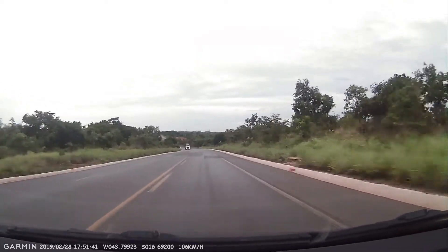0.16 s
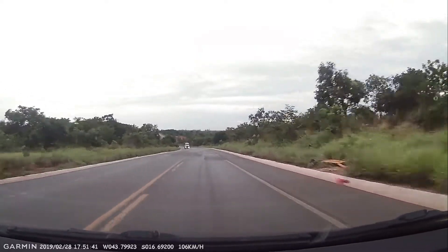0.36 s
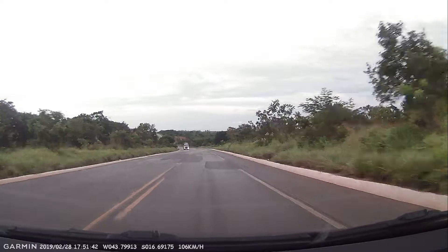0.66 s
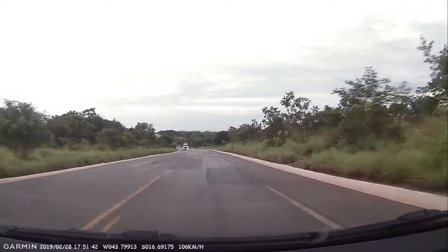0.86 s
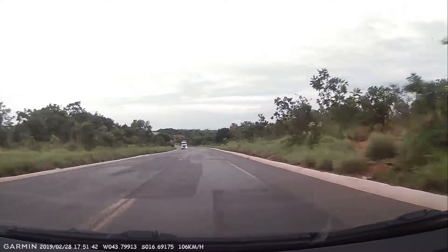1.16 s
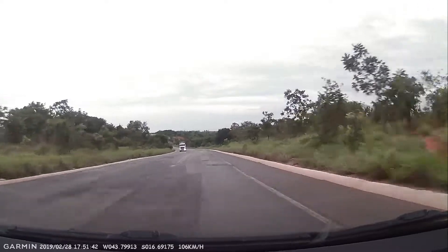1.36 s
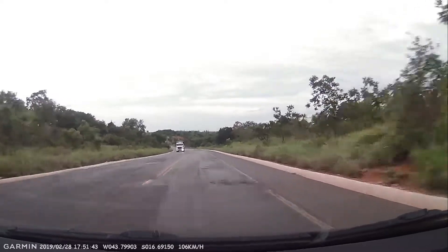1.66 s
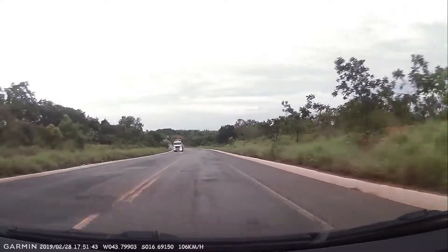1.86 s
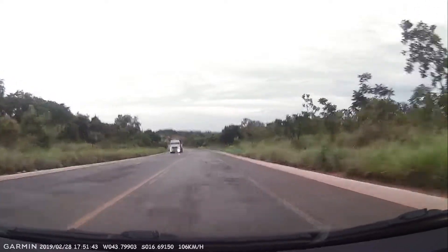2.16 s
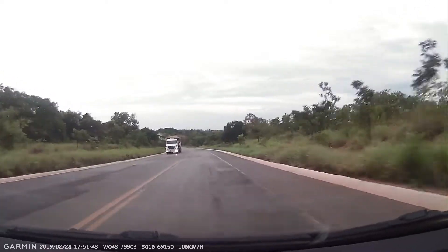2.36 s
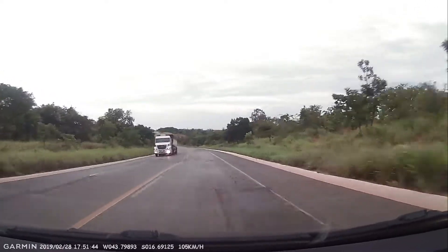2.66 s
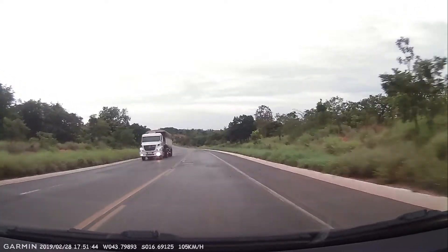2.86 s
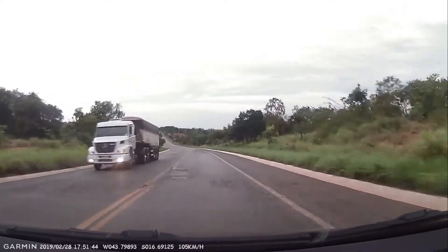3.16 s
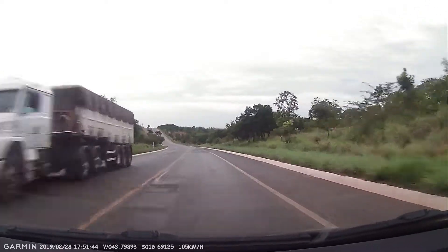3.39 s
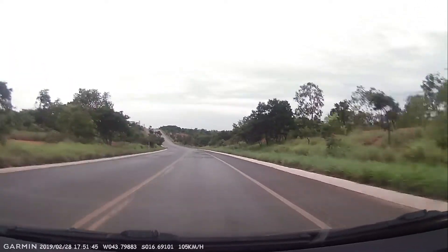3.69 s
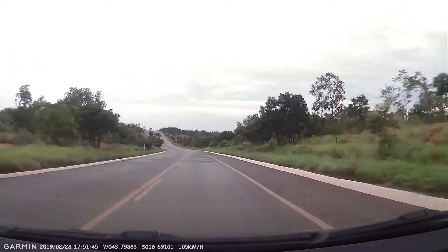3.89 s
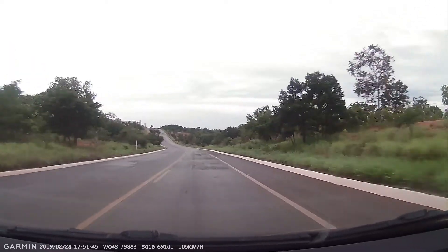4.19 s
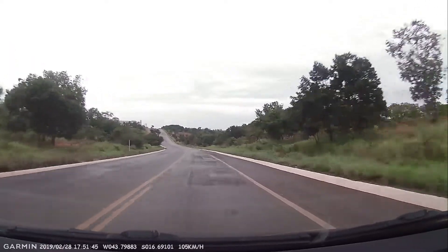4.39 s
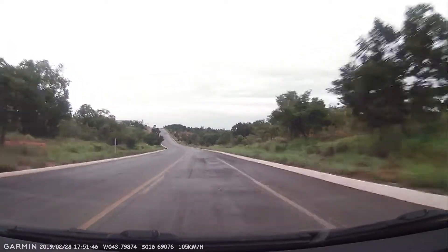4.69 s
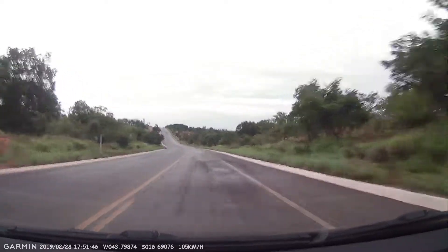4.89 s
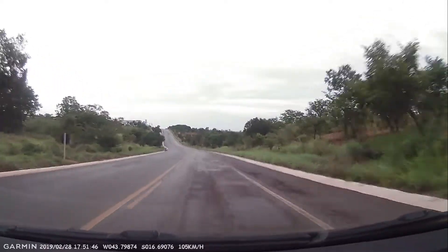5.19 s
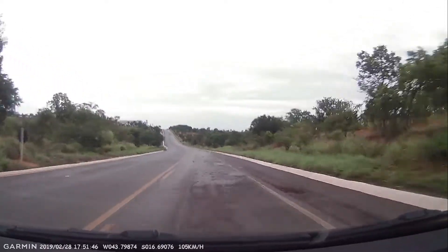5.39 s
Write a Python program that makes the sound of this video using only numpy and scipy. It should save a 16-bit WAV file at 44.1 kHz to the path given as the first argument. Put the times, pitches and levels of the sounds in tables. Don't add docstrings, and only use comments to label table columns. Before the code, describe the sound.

Inside a car cruising at highway speed, a small microphone near the dashboard picks up dominant deep, wavering rumble from suspension, body and tyres, over a steady low engine note around 100 Hz. Muffled tread roar, gentle wind hiss and faint microphone hiss sit above. The first second is fairly smooth, with a bump near 0.5 s. Rougher patches begin around 1.3 s; from 2.1 to 2.6 s bass jolts overload the microphone and loose trim rattles with sharp, high ticks. A light scratchy rub comes at 2.8-3 s, a dull knock at 3.1 s. Around 3.6 s a truck passes, slightly swelling roar and wind, with rattling. A heavy low thump distorts at 3.9 s, then it calms. A softer rub with a faint lingering ring comes near 4.6 s. From 4.8 s bumps, ticks, tiny plastic squeaks and overloaded thumps return until the end at 5.5 s.

```python
import sys
import numpy as np
from scipy import signal
from scipy.io import wavfile
from scipy.ndimage import uniform_filter1d

SR = 44100
rng = np.random.default_rng(int(sys.argv[2]) if len(sys.argv) > 2 else 0)


def unload_audio(sound):
    columns = np.transpose(np.atleast_2d(sound))
    steps = np.round(np.clip(columns, -1, 1) * 32767)
    wavfile.write(sys.argv[1], SR, steps.astype(np.int16))


def how_loud(loudness_db):
    steps = np.asarray(loudness_db, float) / 20
    return 10 ** steps


N = 244314


def evened(x):
    return x / np.sqrt(np.mean(x ** 2) + 1e-20)


def follow(rows):
    s, *columns = np.transpose(rows)
    return [np.interp(np.arange(N) / SR, s, c) for c in columns]


def resonate(x, hz, width, order=1):
    turn = np.exp(2j * np.pi * hz * np.arange(len(x)) / SR)
    r = np.exp(-np.pi * width / SR)
    low = x * turn.conj()
    for _ in range(order):
        low = signal.lfilter([1 - r], [1, -r], low)
    return 2 * (turn * low).real


def modes(x, table, order=1):
    total = 0
    for k, (hz, width, db) in enumerate(table):
        stretch = np.roll(x, 9001 * k)
        total = total + how_loud(db) * evened(resonate(stretch, hz, width, order))
    return total


def steadied(x, seconds):
    span = int(seconds * SR)
    power = uniform_filter1d(uniform_filter1d(x ** 2, span), span)
    return x / np.sqrt(power + 1e-9)


def hiss(spectrum, patchy_db, flicker_db):
    frames, hz = N // 128 + 5, np.fft.rfftfreq(512, 1 / SR)
    a, b, patches = rng.standard_normal((frames, 257, 3)).T
    patches = evened(uniform_filter1d(uniform_filter1d(patches, 5, 0), 20, 1))
    flicker = evened(uniform_filter1d(rng.standard_normal(frames), 6))
    f, db = np.transpose(spectrum)
    shape_db = np.interp(np.log(hz + 1), np.log(f + 1), db)[:, None]
    z = (a + 1j * b) * how_loud(shape_db + patchy_db * patches + flicker_db * flicker)
    return evened(signal.istft(z, nperseg=512, noverlap=384)[1][:N])


def bursts(table, rise):
    length = 4000
    out, t = np.zeros(N + length), np.arange(length) / SR
    grit = rng.standard_normal((len(table), length))
    for (s, db, hz, width, t60), noise in zip(table, grit):
        ring = evened(resonate(noise, hz, width, order=2))
        ring = ring * np.minimum(t / rise, 1) * how_loud(-60 * t / t60)
        out[int(s * SR):][:length] += how_loud(db) * ring
    return out[:N]


# time in seconds, waviness in dB.
UNDULATION = [(0, -10), (.12, -11), (.32, -21.5), (1.19, -25.5), (1.36, -16.5), (1.68, -10.5), (1.88, -15),
              (2.25, -10), (2.62, -11), (2.72, -20), (3.47, -17), (3.95, -8), (4.06, -19.5), (4.6, -29.5),
              (4.8, -11.5), (5.25, -11.5), (5.45, -15), (5.54, -20)]
# time in seconds, coarseness in dB.
TEXTURE = [(0.0, -22.5), (1.13, -24), (1.36, -16), (1.53, -23), (1.56, -11), (1.77, -19.5), (1.96, -16),
           (2.04, -16.5), (2.11, -11), (2.98, -13), (3.07, -20), (3.13, -9.5), (3.21, -15.5), (4.0, -13),
           (4.06, -28.5), (4.97, -13), (5.37, -7.5), (5.54, -16)]
# time in seconds, grit in dB.
FINE_GRIT = [(0.0, -16), (0.12, -32.5), (1.36, -35), (1.53, -27), (1.68, -33.5), (2.16, -23.5), (3.01, -27),
             (3.15, -28), (3.18, -32.5), (3.53, -32), (3.63, -24), (3.66, -24), (3.8, -21), (4.14, -35.5),
             (5.26, -22), (5.31, -25), (5.34, -29.5), (5.54, -24.5)]
# centre in Hz, usual level in dB,
# then shares of waviness, coarseness and grit in dB per dB.
SHAKEN_PARTS = [(24.7, -14, 0.87, 0.0087, 0.012), (61.5, -18, 0.15, 0.95, 0.009),
                (129, -21.5, .01, 1, 0.064), (200, -32.5, 0.044, 0.15, 0.5),
                (322.1, -35.5, 0.034, 0.029, 0.62), (700, -39.5, 0.018, .02, 0.38),
                (1800, -49.5, .02, 0.014, 0.12)]
# time in seconds, extra shaking in dB, favoured frequency in Hz.
ROAD_BUMPS = [(.04, -7, 338), (.09, 7.5, 60), (.55, 12.5, 110), (.72, 5, 60.33), (.88, 6, 60),
              (1.18, 6, 900), (1.27, 10, 110), (1.49, 6.5, 222), (2.47, 5, 200), (1.66, 2, 1800),
              (1.93, 7, 60), (2.09, 11, 245), (2.16, 5.5, 1500), (2.239, 7.5, 50), (2.349, 9, 350),
              (2.6, -2, 99), (2.85, -1, 125), (3.1, 1, 700), (3.121, 5, 81.8), (3.619, 11.5, 256),
              (3.73, 1, 1500), (3.45, 3.5, 110), (3.72, 2, 120.8), (3.84, 6, 247), (4.84, 12, 490),
              (4.94, 8.5, 900), (5.04, -1.5, 120), (5.15, 10.5, 501), (5.249, 7.5, 62.07),
              (5.29, 10.5, 296)]


def shaking():
    usual_db = (-16, -16, -30)
    curves = (UNDULATION, TEXTURE, FINE_GRIT)
    textures = [follow(curve)[0] - usual for curve, usual in zip(curves, usual_db)]
    rise_s, fall_s, cycles, octaves = 0.017, 0.043, 0.25, 0.52
    t, swells = np.arange(N) / SR, []
    for s, db, bump_hz in ROAD_BUMPS:
        width = np.where(t < s, rise_s, fall_s) + cycles / bump_hz
        swells.append((bump_hz, db * np.exp(-((t - s) / width) ** 2)))
    levels = []
    for hz, db, *shares in SHAKEN_PARTS:
        level = db + np.dot(shares, textures)
        for bump_hz, swell in swells:
            level = level + swell * np.exp(-(np.log2(bump_hz / hz) / octaves) ** 2)
        levels.append(level)
    return levels


# centre in Hz, width in Hz, strength in dB.
SUSPENSION = [(16.59, 9.77, 2), (26.32, 9.6, -0.5), (35.03, 9.5, -4.5), (41.83, 10.7, -6.5)]
BODY_SHELL = [(51.4, 20.5, -5.5), (62.04, 9.16, -1.5), (80.45, 16, -3)]
CABIN_AIR = [(117.4, 14.7, -4.5), (139.6, 31.7, -10.5)]
TYRE_CAVITY = [(184.6, 67, 3), (240.6, 140, -9)]
TYRE_SIDEWALL = [(283.5, 69, 4), (360, 80, 4.5), (412, 57, -12.5)]


def road(levels_db):
    tables = (SUSPENSION, BODY_SHELL, CABIN_AIR, TYRE_CAVITY, TYRE_SIDEWALL)
    rumble = 0
    for db, table in zip(levels_db, tables):
        ringing = modes(rng.standard_normal(N), table, order=2)
        rumble = rumble + how_loud(db) * steadied(ringing, 0.12)
    return rumble


# time in seconds, push in dB, #
HARD_JOLTS = [
    (2.184, -1, 1),
    (2.256, -3, 1),
    (2.276, -2.5, -1),
    (3.918, -1, -1),
    (3.937, 1.5, 1),
    (5.265, 0, 1),
    (5.329, -1, 1),
    (5.54, -26, 1),
]


def jolted(rumble):
    t = np.arange(N) / SR
    push_s, override = 0.006, 0.6
    for s, db, way in HARD_JOLTS:
        push = np.exp(-((t - s) / push_s) ** 2)
        rumble = rumble * (1 - override * push) + way * how_loud(db) * push
    return rumble


# time in seconds, pitch in Hz, level in dB.
FIRING_NOTE = [(0, 99.8, -22.5), (.5, 100, -22), (1.2, 100, -22), (1.5, 99.8, -20), (1.7, 99.65, -22.5),
               (2.0, 100, -18), (2.4, 99.6, -20), (2.9, 99.8, -22.5), (3.2, 99.43, -19.5),
               (3.5, 99.6, -17.5), (3.75, 99.6, -24), (4.2, 100.1, -24), (4.6, 100.4, -19.5),
               (5.0, 100.2, -21.5), (5.54, 100.7, -20.5)]


def engine():
    hz, db = follow(FIRING_NOTE)
    waver = evened(resonate(rng.standard_normal(N), 0, 0.87, order=2))
    turn = 2 * np.pi * np.cumsum(hz + 0.34 * waver) / SR
    return np.sqrt(2) * how_loud(db) * (np.sin(turn) + how_loud(-45.5) * np.sin(2 * turn))


# frequency in Hz, density in dB per Hz.
TREAD_SPECTRUM = [(240, -7), (400, 5), (426, -16), (493, -2.5), (614, -2.5), (719, -10.5), (912, -5),
                  (1420, -22), (1600, -22), (2080, -43), (3520, -120)]
WIND_SPECTRUM = [(760, -7.5), (1300, -1), (1430, -4.5), (1760, -0.5), (1900, -4.5), (2310, -5.5),
                 (6000, -21.5), (7800, -21), (13200, -120)]


def roar(tread_db, wind_db):
    abeam_s, approach_s, wake_s = 3.63, 0.1, 0.39
    t = np.arange(N) / SR - abeam_s
    truck = np.exp(-(t / np.where(t < 0, approach_s, wake_s)) ** 2)
    tread = steadied(hiss(TREAD_SPECTRUM, 1.16, 0.27), 0.25)
    wind = steadied(hiss(WIND_SPECTRUM, 0.18, 1.0), 0.054)
    return how_loud(tread_db + 1 * truck) * tread + how_loud(wind_db + 2 * truck) * wind


# start in seconds, length in seconds, level in dB.
RATTLE_SPELLS = [(.08, 0.062, -56), (1.3, 0.24, -66), (1.602, 0.094, -53), (1.72, .3, -62),
                 (1.983, 0.15, -54.5), (2.126, 0.33, -50.5), (2.48, .12, -53), (2.661, 0.071, -61),
                 (2.97, 0.034, -59), (3.134, .06, -54), (3.513, 0.15, -56.5), (3.677, 0.16, -46),
                 (3.858, 0.2, -58), (4.873, 0.19, -57), (5.053, .17, -50), (5.235, .24, -49.5)]


def looseness():
    t = np.arange(N) / SR
    idle_db, edge_s = -78, 0.1
    level = how_loud(idle_db)
    for s, length, db in RATTLE_SPELLS:
        inside = np.minimum(t - s, s + length - t)
        level = level + how_loud(db) * np.clip(inside / edge_s + 0.5, 0, 1)
    return level


# centre in Hz, width in Hz, strength in dB.
TRIM_MODES = [(6850, 1800, -7), (8600, 900, -7), (9900, 800, -3), (10600, 600, -2), (11200, 800, 0),
              (12300, 1800, -5), (14200, 3000, -5), (4600, 2500, -7)]


def rattle():
    unsteady = evened(resonate(rng.standard_normal(N), 0, 40.0))
    swings = np.cumsum(82.0 * how_loud(7.0 * unsteady)) / SR
    strength = how_loud(0.99 * rng.standard_normal(N // 40))[swings.astype(int)]
    clumps = 0.25 + strength * np.exp(-(swings % 1) / 0.22)
    shape = (len(TRIM_MODES), N)
    knocks = rng.standard_normal(shape) * (rng.random(shape) < 3000 / SR) * clumps
    chatter = sum(modes(k, [mode], order=2) for k, mode in zip(knocks, TRIM_MODES))
    return looseness() * steadied(chatter, 0.025)


# time in seconds, peak in dB, ring in Hz.
TRIM_TICKS = [(0.117, -36, 10900), (1.3694, -37, 11710), (1.5768, -38, 10400), (2.148, -28, 8840),
              (2.168, -25, 11000), (2.2189, -31, 9810), (2.2384, -26, 10900), (2.2777, -35, 8260),
              (2.295, -27, 10200), (2.3186, -32, 10600), (2.3849, -35, 11200), (2.413, -39, 11160),
              (2.4423, -30, 10300), (2.5127, -29, 11410), (2.5222, -27.5, 10600), (2.5735, -36, 10600),
              (2.7018, -34, 10800), (2.9935, -30, 10860), (3.1657, -34, 10800), (3.6885, -32, 10600),
              (3.7155, -33, 11200), (3.7708, -35.5, 10900), (3.7938, -35, 10610), (5.0799, -26, 10700),
              (5.1131, -36, 10500), (5.1537, -29, 11300), (5.2515, -34, 11500), (5.2929, -38, 11000),
              (5.3482, -28, 11150), (5.436, -37, 10970)]
# time in seconds, peak in dB, ring in Hz, width in Hz, 60 dB decay in seconds.
DASH_KNOCKS = [
    (1.18, -43, 1620, 900, 0.11),
    (1.646, -45.5, 3600, 6000, 0.13),
    (2.339, -36, 690, 990, 0.18),
    (3.095, -31, 780, 570, 0.11),
    (3.9, -27.5, 490, 530, 0.059),
    (3.8, -48.5, 14000, 900, .04),
    (3.715, -42, 5000, 7000, .03),
    (5.15, -40, 650, 700, .15),
    (5.355, -44, 8600, 1200, .08),
    (5.28, -29.5, 627.5, 710, 0.21),
]


def ticks():
    width_hz, t60_s = 1300, 0.024
    trim = [(s, db - 8.5, hz, width_hz, t60_s) for s, db, hz in TRIM_TICKS]
    return bursts(trim, 0.0013) + bursts(DASH_KNOCKS, 0.0016)


# time in seconds, level in dB, pitch in Hz.
SHORT_SQUEAKS = [
    (4.828, -52, 2870),
    (5.08, -48, 2950),
    (5.37, -49, 2950),
]


def squeaks():
    t, out = np.arange(N) / SR, 0
    for s, db, hz in SHORT_SQUEAKS:
        out = out + how_loud(db) * np.exp(-((t - s) / 0.0068) ** 2) * np.sin(2 * np.pi * hz * t)
    return out


# centre in Hz, width in Hz, strength in dB.
RUBBED_PART = [(5500, 460, -7), (5570, 200, -2), (6300, 410, 3.5), (7100, 300, 2), (8100, 270, 1),
               (6800, 1900, -2)]
RINGING_ON = [(7450, 110, 6), (7340, 120, 2), (7260, 140, -8)]
# start in seconds, swell in seconds, top level in dB, ring-on in seconds,
# upper mode in dB against the level.
RUB_STROKES = [
    (2.8, 0.14, -51, 0.083, -3),
    (4.56, 0.12, -55, 0.33, -5),
]


def rubs():
    grain_strength = how_loud(1.4 * np.minimum(rng.exponential(1, N), 4))
    slips = rng.standard_normal(N) * grain_strength * (rng.random(N) < 6000 / SR)
    body, ring = evened(modes(slips, RUBBED_PART)), evened(modes(slips, RINGING_ON))
    top = evened(resonate(slips, 8730, 140))
    start_db, stop_s, ring_db, ring_on_db = -14, 0.045, -4, -10
    t, out = np.arange(N) / SR, np.zeros(N)
    for s, swell, db, ring_on, top_db in RUB_STROKES:
        past = np.maximum(t - s - swell, 0)
        remaining = np.clip(1 - (t - s) / swell, 0, 1)
        rising = np.clip((t - s) / 0.018, 0, 1) * how_loud(start_db * remaining ** 2)
        stroke = rising * np.exp(-(past / stop_s) ** 2)
        after = rising * how_loud(ring_on_db) * np.exp(-(past / ring_on) ** 2)
        rubbing = body + how_loud(ring_db) * ring + how_loud(top_db) * stroke * top
        out += how_loud(db) * (stroke * rubbing + after * ring)
    return out


def scene():
    *body_db, tread_db, wind_db = shaking()
    bass = jolted(road(body_db) + engine())
    cabin = bass + roar(tread_db, wind_db) + rattle() + ticks() + squeaks() + rubs()
    return cabin[None]


def band_limit(x):
    return signal.sosfilt(signal.butter(12, 16190, fs=SR, output="sos"), x)


# frequency in Hz, density in dB per Hz.
MICROPHONE_HISS = [(2350, 4.5), (4000, 3), (6370, 2.5), (6830, 3.5), (7400, 3.5), (10800, 3.5),
                   (14800, 1.5), (15800, 3.5)]


def record(dry):
    hiss_db, clip, ceiling = -50.5, 0.69, 0.706
    noise = hiss(MICROPHONE_HISS, 0.51, 0.17)
    overloaded = np.clip(dry + how_loud(hiss_db - 5.0) * noise, -clip, clip)
    coupled = signal.lfilter(*signal.butter(1, 1.2, "high", fs=SR), overloaded)
    converted = np.clip(coupled, -ceiling, ceiling) + how_loud(hiss_db - 6.5) * noise[::-1]
    edge = signal.firwin(801, 15790, window=("kaiser", 8), fs=SR)
    mix = signal.oaconvolve(converted, edge[None], "same")
    return band_limit(mix)


dry = scene()
out = record(dry)
unload_audio(out)
```